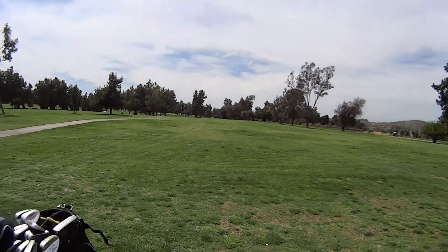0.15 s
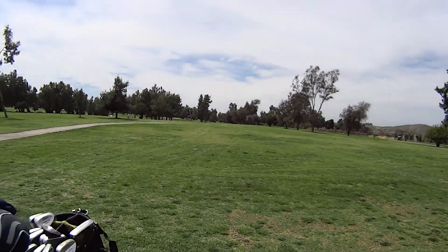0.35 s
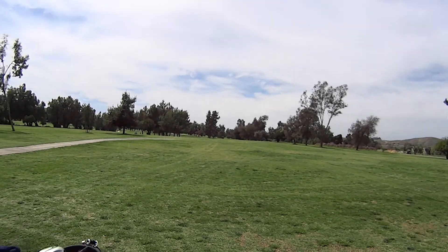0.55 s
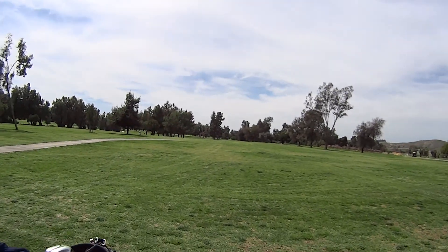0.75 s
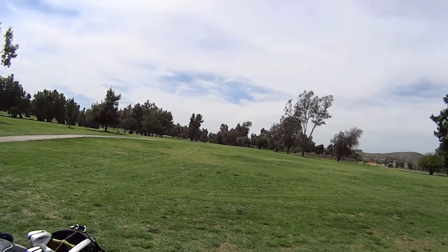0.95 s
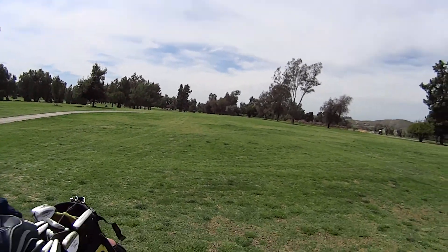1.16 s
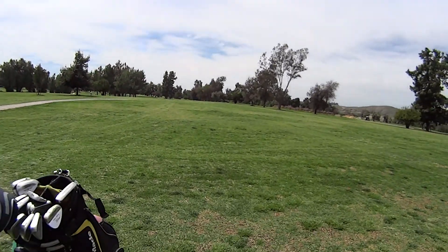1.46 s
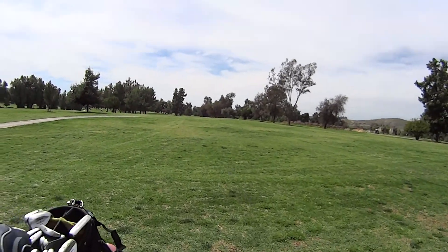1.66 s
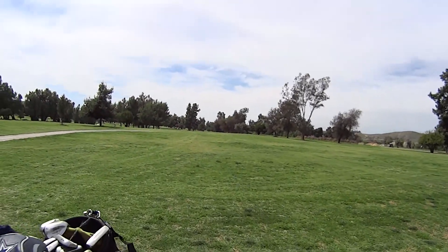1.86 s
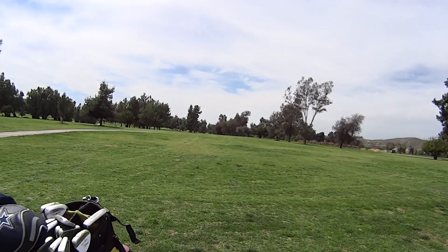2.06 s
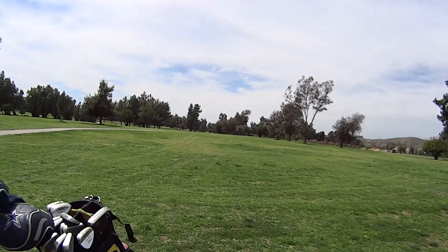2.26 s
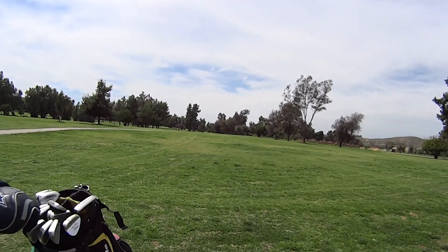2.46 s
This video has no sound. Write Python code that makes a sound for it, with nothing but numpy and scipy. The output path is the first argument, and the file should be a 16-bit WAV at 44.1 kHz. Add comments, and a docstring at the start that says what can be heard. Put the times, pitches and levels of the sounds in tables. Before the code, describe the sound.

Golf clubs clink and rattle in a bag, close and slightly left. Short, dry, bright clicks with muffled chatter come irregularly from the start, stronger around 0.6-1.0 s, then a dense, loudest clatter at 1.1-1.45 s. It thins to faint rattling until a soft thump and click near 1.92 s; a smaller flurry follows at 2.2-2.4 s. Quiet fabric scuffs, low gusty wind and wide outdoor hiss lie beneath.

```python
"""An open golf course: a bag of clubs is carried over grass, close to the camera microphone, a little left.
Each knock is a dry click of two club heads (a few damped modes), then a chatter of shafts muffled
by the bag (sparse random contacts ringing the same modes); some contacts also snap in the treble.
Around it: faint constant rattling with a treble sizzle, soft bumps and fabric scuffs of the bag,
low gusty wind rumble and wide open-air hiss, all shaped from noise except the ticks and bumps (damped sines)."""
import sys
import numpy as np
from scipy import signal
from scipy.fft import rfft, irfft, next_fast_len
from scipy.io import wavfile
from scipy.ndimage import map_coordinates

SR = 44100
rng = np.random.default_rng(int(sys.argv[2]) if len(sys.argv) > 2 else 0)


def voltage_ratio(level):
    """Linear amplitude factor for a level in decibels (scalar or array-like)."""
    return 10 ** (np.asarray(level, float) / 20)


def bounce(signal):
    """Save signal as a 16-bit WAV file at the path given by the first command-line argument."""
    frames = np.transpose(np.atleast_2d(signal))
    limited = np.clip(frames, -1, 1)
    pcm = np.round(limited * 32767).astype(np.int16)
    wavfile.write(sys.argv[1], SR, pcm)


N = 116865  # samples

# Knocks of the clubs, levels ahead of the body filter and placement:
# t/s, click peak level/dB, click f/Hz, chatter level/dB (rms over about t60 / 4), chatter f/Hz, chatter t60/s
KNOCKS = [(0.0641, -27, 3440, -44, 2700, 0.027), (0.0944, -32.5, 4900, -51, 3200, 0.02),
          (0.142, -32, 4050, -53.5, 2830, 0.03), (0.186, -24.5, 4050, -42, 2940, 0.043),
          (0.2132, -48, 3800, -51.5, 3270, 0.018), (0.282, -41.5, 2700, -62, 3700, 0.031),
          (0.316, -33, 2400, -53.5, 2850, 0.084), (0.3423, -51, 2840, -46.5, 2900, 0.017),
          (0.375, -39, 2430, -56, 3350, 0.02), (0.382, -42.5, 3500, -68, 4200, 0.026),
          (0.4276, -38.5, 5400, -68, 3600, 0.035), (0.4875, -49, 3330, -44, 2520, 0.044),
          (0.5074, -42, 2400, -58, 2900, 0.047), (0.5219, -38.5, 4700, -49, 2930, 0.041),
          (0.527, -31, 3260, -52.5, 2500, 0.032), (0.6393, -23, 3360, -43, 2700, 0.03),
          (0.7071, -36.5, 4200, -63, 3900, 0.025), (0.8055, -21.5, 4500, -40.5, 3000, 0.034),
          (0.8093, -36, 2500, -47, 2940, 0.037), (0.8182, -39, 3600, -48, 2970, 0.05),
          (0.9607, -27.5, 5400, -64, 4000, 0.027), (0.9546, -23.5, 4050, -49.5, 4500, 0.072),
          (0.9639, -35, 4230, -53, 3100, 0.068), (0.9685, -47, 3300, -70, 3100, 0.035),
          (0.9777, -44, 4670, -59, 3400, 0.032), (0.988, -17, 3510, -43.5, 3200, 0.04),
          (0.9922, -29, 3260, -51, 2700, 0.12), (1.0274, -36, 2700, -56.5, 1970, 0.08),
          (1.1151, -24, 4500, -43.5, 3820, 0.029), (1.1273, -51, 2500, -48.5, 2760, 0.027),
          (1.1393, -39, 4200, -55, 2700, 0.04), (1.1677, -20.5, 3250, -41.5, 3750, 0.046),
          (1.1791, -13, 4500, -35.5, 3620, 0.021), (1.1831, -27, 2460, -66, 2500, 0.028),
          (1.189, -36, 4100, -47, 2400, 0.028), (1.202, -37, 4000, -50, 3520, 0.031),
          (1.213, -24.5, 3750, -46, 4130, 0.025), (1.219, -22, 4700, -44.5, 3840, 0.028),
          (1.229, -23.5, 4260, -46.5, 4000, 0.046), (1.237, -24, 3340, -44.5, 3280, 0.022),
          (1.2548, -44, 4000, -51, 2980, 0.032), (1.2971, -33, 2900, -42, 2470, 0.017),
          (1.308, -40, 3500, -52, 3000, 0.023), (1.3178, -29.5, 4500, -47, 2700, 0.042),
          (1.3315, -46, 4500, -56, 3500, 0.033), (1.3399, -34, 4200, -71, 4000, 0.018),
          (1.3429, -24, 3580, -40.5, 2700, 0.011), (1.3495, -37, 4120, -38, 3250, 0.035),
          (1.3576, -34, 4730, -51, 3340, 0.08), (1.3756, -30.5, 3360, -51, 4000, 0.061),
          (1.3853, -32.5, 3600, -48, 2800, 0.056), (1.4178, -45, 2600, -51, 3320, 0.037),
          (1.442, -31.5, 4100, -40.5, 2580, 0.02), (1.4463, -34.5, 2610, -55, 2300, 0.027),
          (1.508, -41, 4700, -63, 3020, 0.021), (1.7754, -47, 3000, -57, 3660, 0.054),
          (1.792, -43.5, 3600, -57.5, 3300, 0.063), (1.9363, -23.5, 3460, -41.5, 3000, 0.018),
          (1.9405, -34.5, 2460, -51, 2500, 0.025), (2.0413, -30.5, 4000, -45.5, 3130, 0.024),
          (2.073, -40, 3600, -56, 2500, 0.017), (2.175, -57, 2200, -51.5, 2150, 0.035),
          (2.1812, -56, 3470, -49, 4100, 0.035), (2.1855, -40.5, 3340, -45, 3780, 0.048),
          (2.2121, -25.5, 4050, -48, 2950, 0.055), (2.2165, -40, 2400, -50, 2400, 0.062),
          (2.2211, -28.5, 4600, -44, 3380, 0.018), (2.2256, -34, 3200, -54.5, 2500, 0.045),
          (2.2422, -33.5, 3400, -54, 3650, 0.031), (2.2782, -29.5, 4500, -42.5, 2600, 0.023),
          (2.288, -33, 3660, -54, 3300, 0.018), (2.293, -37, 2600, -61, 2600, 0.026),
          (2.321, -26, 3140, -52, 3000, 0.031), (2.36, -27, 4360, -55, 4100, 0.044),
          (2.5173, -44, 3260, -59, 2980, 0.028), (2.5296, -48, 3500, -57, 2940, 0.028)]
# Modes that heads and shafts ring with, ahead of scatter and detuning: f/Hz, relative level/dB, longest t60/s
CLUB_MODES = [(1485, -8.5, 0.031), (2130, 4, 0.016), (2400, 1.5, 0.019), (2677, 3, 0.0082),
              (3128, 9, 0.0057), (3592, 13, 0.0029), (4000, -2, 0.017), (4500, 4, 0.015),
              (5130, 12.5, 0.0074), (5840, 12, 0.0053), (7240, 8, 0.0099), (9770, 8.5, 0.01)]
# Treble snaps of some contacts, ahead of the body filter and placement: t/s, peak level/dB
SNAPS = [(0.0648, -31.5), (.186, -36), (0.6382, -26), (0.8059, -29.5), (0.9555, -36), (0.9872, -25),
         (1.2136, -24.5), (1.2194, -43), (1.3484, -34.5), (1.9361, -35), (2.321, -37), (2.359, -40)]
# Course of the rattling, ahead of its trim: t/s, level/dB
RATTLE_LEVEL = [(0.0, -57.5), (0.32, -55), (0.58, -59.5), (0.8, -56.5), (1.06, -55), (1.19, -53.5),
                (1.29, -51), (1.48, -55.5), (1.68, -60), (2.14, -56), (2.65, -58.5)]
# Spectrum of the treble hiss in the rattling: f/Hz, relative level/dB (per Hz)
SIZZLE_SPECTRUM = [(4000, -31), (5500, 2), (7000, -18), (8600, -7), (9700, -5), (11000, -7), (12000, -43)]
# Soft bumps of the bag: t/s, level/dB (ahead of the soft onset), f/Hz, t60/s
BUMPS = [(.427, -44, 317, 0.022), (.923, -39.5, 555, 0.0085), (1.07, -46, 617, 0.013),
         (1.9184, -34.5, 1360, 0.013), (1.918, -37, 512, 0.0072), (1.9218, -28.5, 155, 0.015),
         (1.985, -51, 1055, 0.044)]
# Course of the bag's fabric scuffing, ahead of its random wobble: t/s, level/dB
CLOTH_LEVEL = [(0.0, -63.5), (0.43, -65.5), (0.91, -70.5), (0.92, -57.5), (0.94, -67.5), (1.08, -59),
               (1.11, -67.5), (1.33, -64), (1.9, -71), (1.92, -53.5), (1.97, -68), (1.98, -59),
               (2.02, -67.5), (2.11, -67.5), (2.65, -70)]
# Spectrum of the fabric: f/Hz, relative level/dB (per Hz)
CLOTH_SPECTRUM = [(80, -11), (200, 1), (500, -2.5), (1000, -6), (1600, -8), (3000, -25)]
# Course of the wind, ahead of its random gusts: t/s, level/dB
WIND_LEVEL = [(0.0, -75), (0.02, -52.5), (0.25, -62), (0.26, -55), (0.61, -60), (1.1, -56.5), (1.22, -62.5),
              (1.36, -53.5), (1.4, -60), (1.45, -48.5), (1.47, -57), (1.87, -62), (1.92, -52),
              (2.15, -63.5), (2.26, -60.5), (2.31, -62), (2.39, -58.5), (2.65, -57)]
# Spectrum of the wind rumble: f/Hz, relative level/dB (per Hz)
WIND_SPECTRUM = [(11, -44), (20, -5), (43, 5.5), (56, -3.5), (75, -9), (144, -13.5), (250, -25.5),
                 (320, -59), (550, -120)]
# Spectrum of the air common to both channels: f/Hz, relative level/dB (per Hz)
AIR_MID_SPECTRUM = [(70, -32), (120, -6), (220, -14.5), (500, -16), (1100, -16), (2200, -13), (3000, -18.5),
                    (5200, -18.5), (7000, -18), (8600, -22.5), (9700, -18), (11000, -19), (14000, -70)]
# Spectrum of the air opposite in the two channels: f/Hz, relative level/dB (per Hz)
AIR_SIDE_SPECTRUM = [(24, -76), (40, -17), (146, -16.5), (217, -10.5), (324, -10.5), (556, -6),
                     (671, -11.5), (755, -5.5), (11000, -26.5), (14300, -56), (22000, -120)]
# Placement of the bag: f/Hz, left over right level/dB
LEFT_OVER_RIGHT = [(1200, -12), (2200, 5), (4500, 0), (9000, 6)]

CONTACT_S = 0.00029  # onset time of a 4 kHz click, of the snaps and of each rattling contact
CLICK_OCT, CLICK_T60_S = 0.53, 0.0038  # spread about its pitch; longest decay of a 4 kHz click
MODE_SCATTER_DB, DETUNE = 2.5, .035  # standard deviations; detuning as a share of frequency
CHATTER_OCT, CHATTER_RATE, CHATTER_DELAY_S = 1, 1800, 0.0019  # rate in contacts per second
CHATTER_DULLS, DULL_HZ = 0.75, 2700  # power by which higher modes fade sooner; where the listed t60 holds
SNAP_HZ, SNAP_T60_S = 5930, 0.0038  # lower edge; decay
RATTLE_HZ, RATTLE_RATE, RATTLE_SPREAD_DB = 2400, 2500, 3  # rate in contacts per second, all clubs together
RATTLE_TRIM_DB, SIZZLE_DB, SIZZLE_GROWS = -5, -70.5, 1  # growth in dB per dB of rattling
GUST_DB, AIR_MID_DB, AIR_SIDE_DB = 1.5, -60.5, -58.5
BODY_HZ = 1436  # thin clubs radiate little below this
LEFT_LEAD_S, WIDE_DB = .00001, -9.5  # lead of the left channel; level of the widening row
TOP_HZ, LEAK_DB, LEAK_HZ_PER_DB = 11030, -22, 250  # band limit; level just above it and its further fall


def knocks():
    """Struck modes, then their chatter; row two holds a second chatter that widens the image."""
    out = np.zeros((2, N + SR))
    t = np.arange(SR // 12) / SR
    mode_hz = np.transpose(CLUB_MODES)[0, :, None]
    sooner = (mode_hz / DULL_HZ) ** CHATTER_DULLS
    for s, click_db, click_hz, chatter_db, chatter_hz, t60 in KNOCKS:
        at = round(s * SR)
        slow = (4000 / click_hz) ** 1.2  # duller clicks are slower
        click = modes(click_hz, CLICK_OCT, CLICK_T60_S * slow, CONTACT_S * slow).sum(axis=0)
        out[0, at:at + len(click)] += voltage_ratio(click_db) * click / np.abs(click).max()
        fade = voltage_ratio(-60 * t * sooner / max(t60, .005))
        fade = fade * (1 - np.exp(-(t / CHATTER_DELAY_S) ** 2))
        for row in out:
            contacts = fade * taps(len(t), CHATTER_RATE, 1.96)
            ringing = modes(chatter_hz, CHATTER_OCT, 1)
            chatter = signal.fftconvolve(contacts, ringing, axes=1).sum(axis=0)
            level = voltage_ratio(chatter_db) * np.sqrt(t60 / t[-1] / 4)
            row[at:at + len(chatter)] += level * unit(chatter)
    out[0] += snaps()
    return out[:, :N]


def snaps():
    """Treble snaps of some contacts: very short high-passed noise bursts."""
    out = np.zeros(N + SR)
    t = np.arange(SR // 12) / SR
    treble = signal.butter(4, SNAP_HZ, "high", fs=SR, output="sos")
    envelope = voltage_ratio(-60 * t / SNAP_T60_S) * (1 - np.exp(-t / CONTACT_S))
    for s, db in SNAPS:
        snap = signal.sosfilt(treble, rng.standard_normal(len(t)) * envelope)
        out[round(s * SR):][:len(t)] += voltage_ratio(db) * snap / np.abs(snap).max()
    return out


def rattle():
    """Ceaseless ticking of the shafts: random contacts ring six clubs in each of two rows, plus sizzle."""
    def one_club():
        """One club's modes, set ringing by sparse contacts."""
        contacts = taps(N, RATTLE_RATE / 6, RATTLE_SPREAD_DB)
        return signal.fftconvolve(contacts, modes(RATTLE_HZ, 0.95, 1).sum(axis=0))[:N]

    ticking = np.array([unit(sum(one_club() for _ in range(6))) for _ in range(2)])
    level_db = curve(RATTLE_LEVEL)
    # treble hiss that swells with the rattling
    sizzle_db = SIZZLE_DB + SIZZLE_GROWS * (level_db - level_db.mean())
    sizzle = voltage_ratio(sizzle_db) * np.array([noise(SIZZLE_SPECTRUM), noise(SIZZLE_SPECTRUM)])
    return ticking * voltage_ratio(level_db + RATTLE_TRIM_DB) + sizzle


def modes(centre_hz, octaves, longest_s, contact_s=CONTACT_S):
    """Damped club modes near a centre, one row each, newly weighted and detuned at every call."""
    hz, db, t60 = np.transpose(CLUB_MODES)[:, :, None]
    t = np.arange(SR // 60) / SR
    chance = rng.standard_normal((3, len(CLUB_MODES), 1))
    near = np.exp(-.5 * (np.log2(hz / centre_hz) / octaves) ** 2)
    decay_db = -60 * t / np.minimum(t60, longest_s)
    gain = near * voltage_ratio(db + MODE_SCATTER_DB * chance[0] + decay_db)
    ring = np.sin(2 * np.pi * hz * (1 + DETUNE * chance[1]) * t + .5 * chance[2])
    onset = 1 - np.exp(-(t / contact_s) ** 2)
    return gain * ring * onset


def taps(size, rate, spread_db):
    """Sparse random contacts of uneven strength and sign, rate a second."""
    chance = rng.random(size)
    sign, strength = rng.standard_normal((2, size))
    return (chance < rate / SR) * np.sign(sign) * voltage_ratio(spread_db * strength)


def bumps():
    """Dull thuds of the bag: damped sines with a soft onset."""
    t = np.arange(N) / SR
    out = np.zeros(N)
    for s, db, hz, t60 in BUMPS:
        age = np.clip(t - s, 0, None)
        onset = 1 - np.exp(-age / 0.00039)
        out += voltage_ratio(db - 60 * age / t60) * np.sin(2 * np.pi * hz * age) * onset
    return out


def cloth():
    """Low scuffing of the bag's fabric: friction noise of uneven level."""
    return voltage_ratio(curve(CLOTH_LEVEL) + 1.86 * wobble(39.88)) * noise(CLOTH_SPECTRUM)


def wind():
    """Gusty wind rumble, the same in both channels: low noise of wandering level."""
    return voltage_ratio(curve(WIND_LEVEL) + GUST_DB * wobble(9.49)) * noise(WIND_SPECTRUM)


def air():
    """Wide hiss of the open course: independent mid and side noises, each gently wavering."""
    mid = voltage_ratio(AIR_MID_DB + 0.84 * wobble(2.7)) * noise(AIR_MID_SPECTRUM)
    side = voltage_ratio(AIR_SIDE_DB + 0.53 * wobble(4.8)) * noise(AIR_SIDE_SPECTRUM)
    return np.array([mid + side, mid - side])


def unit(x):
    """Bring to rms 1."""
    return x / np.sqrt(np.mean(x ** 2) + 1e-20)


def curve(rows):
    """(t/s, value) rows, interpolated to one value per sample."""
    s, v = np.transpose(rows)
    return np.interp(np.arange(N) / SR, s, v)


def wobble(rate):
    """A smooth random curve, rate knots a second."""
    return map_coordinates(rng.standard_normal(N // 100), [np.arange(N) * rate / SR])


def filtered(x, response):
    """Apply a response, given as a function of f/Hz."""
    m = next_fast_len(N + 8192)  # padding keeps the end off the start
    return irfft(rfft(x, m) * response(np.fft.rfftfreq(m, 1 / SR)), m)[..., :N]


def noise(points):
    """Noise of rms 1 with the spectrum of (f/Hz, level/dB) points."""
    f, v = np.transpose(points)
    shape = lambda hz: voltage_ratio(np.interp(np.log(hz + 1), np.log(f + 1), v))
    return unit(filtered(rng.standard_normal(N), shape))


def scene():
    """The clubs stand close by, a little left; bumps, cloth and wind are central, the air is wide."""
    body = signal.butter(6, BODY_HZ, "high", fs=SR, output="sos")
    mid, side = signal.sosfilt(body, knocks() + rattle())
    half = np.array([[.5], [-.5]])  # left, right

    def placement(hz):
        """Level and arrival time differ between left and right."""
        level = voltage_ratio(np.interp(hz, *np.transpose(LEFT_OVER_RIGHT)) * half)
        return level * np.exp(2j * np.pi * hz * LEFT_LEAD_S * half)

    clubs = filtered(mid, placement) + voltage_ratio(WIDE_DB) * 2 * half * side
    return clubs + bumps() + cloth() + wind() + air()


def band_limit(x):
    """A steep low-pass at the top of the band."""
    return signal.sosfilt(signal.butter(12, 13200, fs=SR, output="sos"), x)


def record(dry):
    """Band limits: nothing up to 15 Hz, sound above the upper limit strongly weakened."""
    def band(hz):
        """Gain at each frequency."""
        leak = voltage_ratio(LEAK_DB - (hz - TOP_HZ) / LEAK_HZ_PER_DB)
        return np.where(hz < TOP_HZ, 1, leak) * (hz > 15)

    return band_limit(filtered(dry, band))


dry = scene()
out = record(dry)
bounce(out)
```